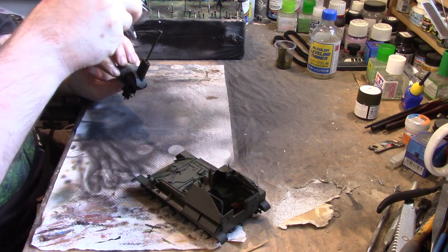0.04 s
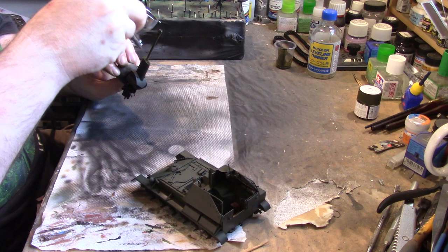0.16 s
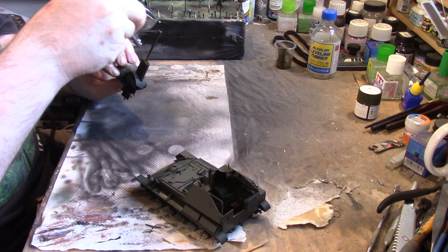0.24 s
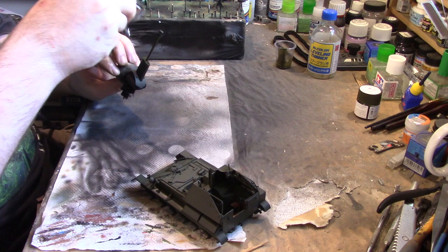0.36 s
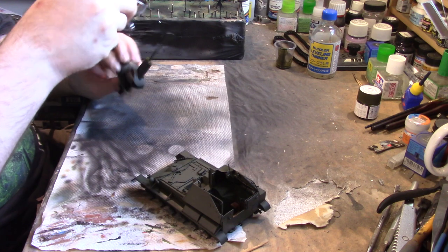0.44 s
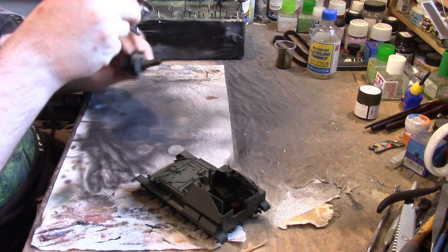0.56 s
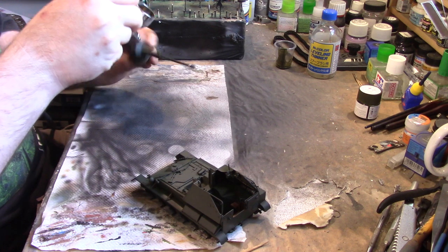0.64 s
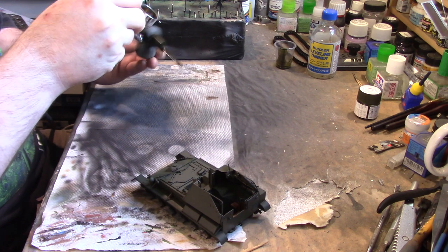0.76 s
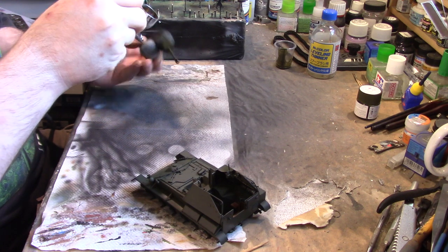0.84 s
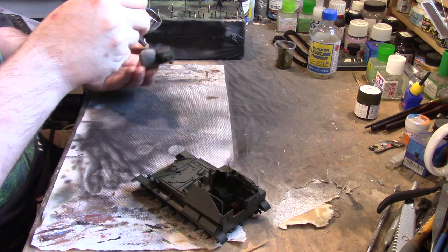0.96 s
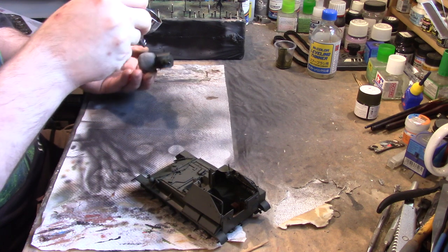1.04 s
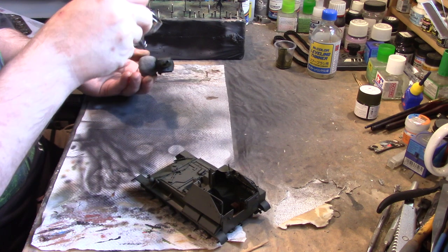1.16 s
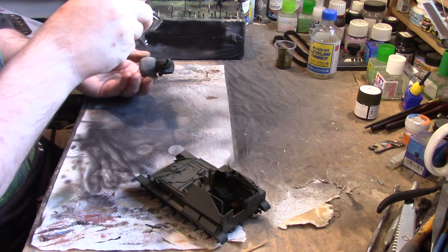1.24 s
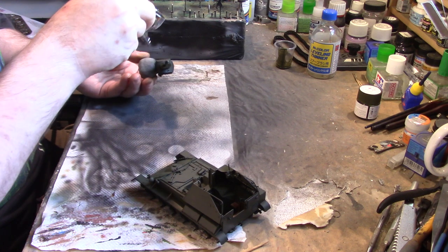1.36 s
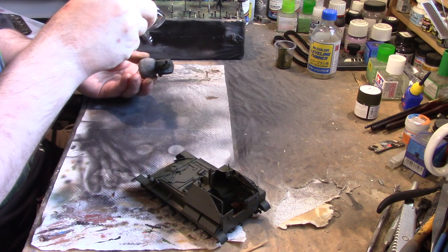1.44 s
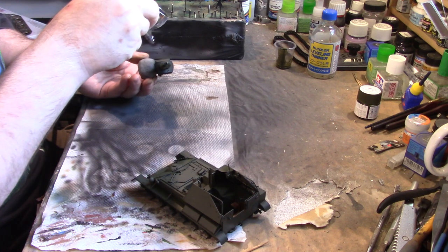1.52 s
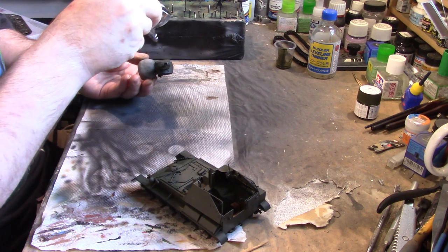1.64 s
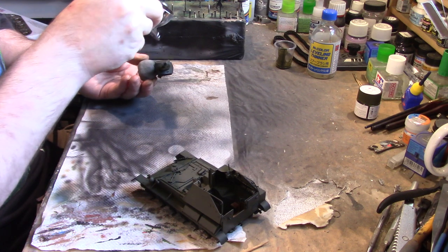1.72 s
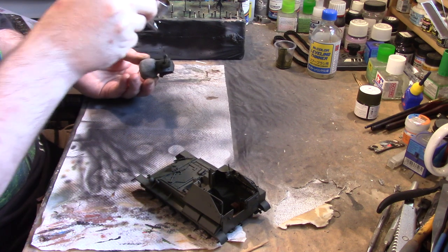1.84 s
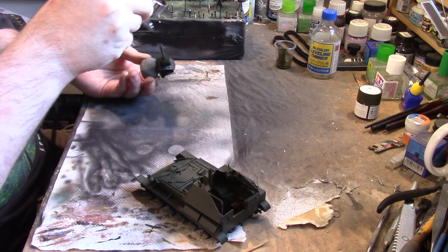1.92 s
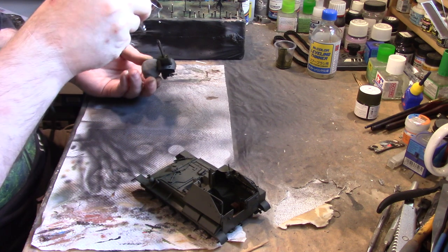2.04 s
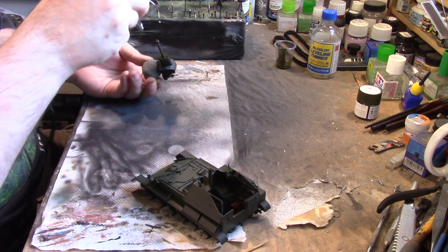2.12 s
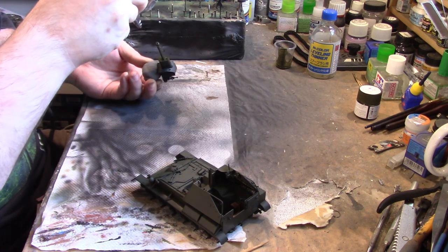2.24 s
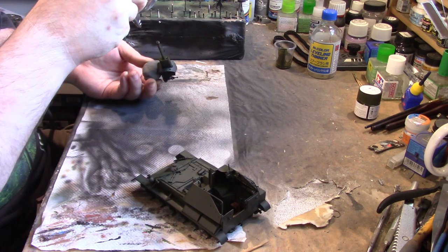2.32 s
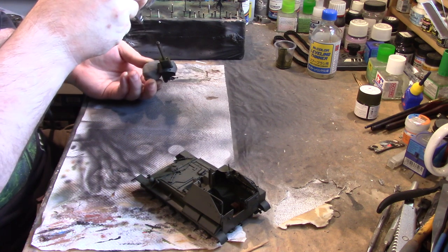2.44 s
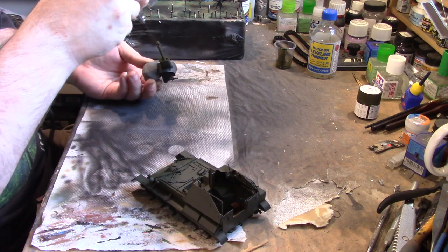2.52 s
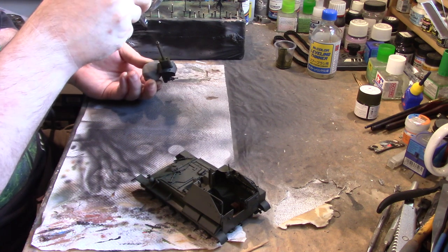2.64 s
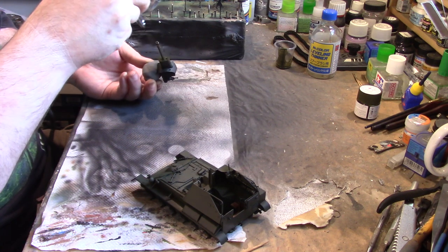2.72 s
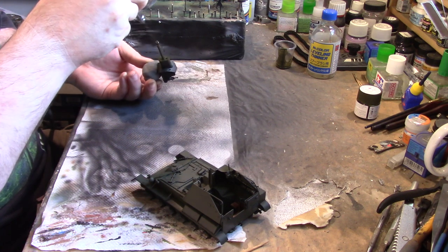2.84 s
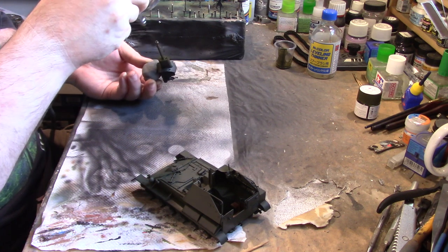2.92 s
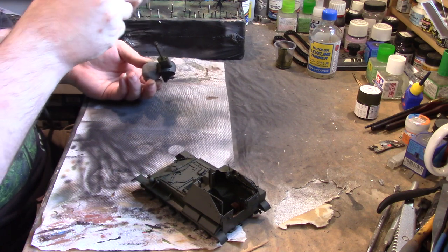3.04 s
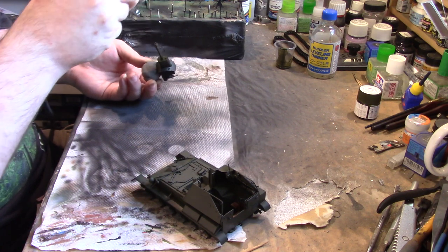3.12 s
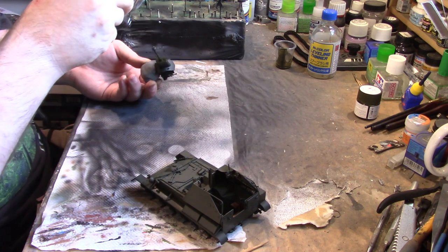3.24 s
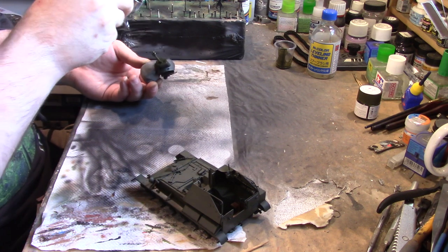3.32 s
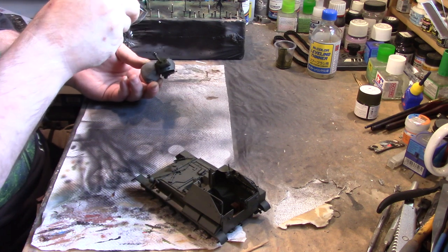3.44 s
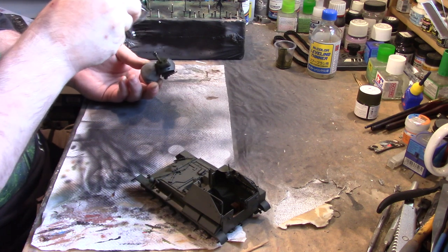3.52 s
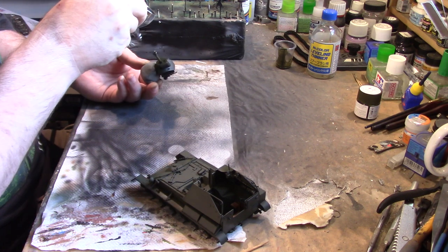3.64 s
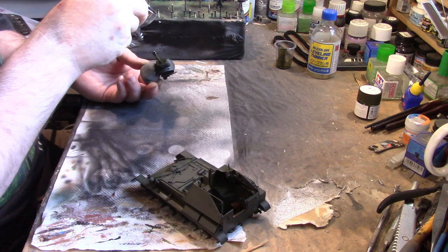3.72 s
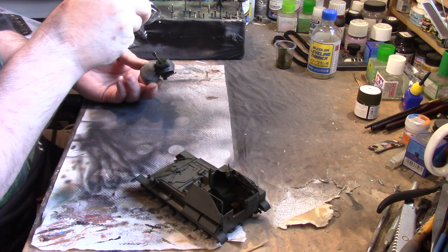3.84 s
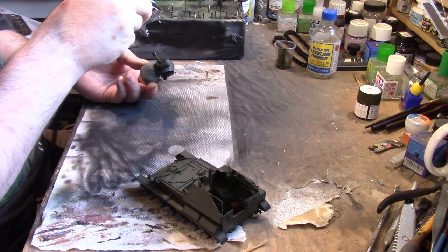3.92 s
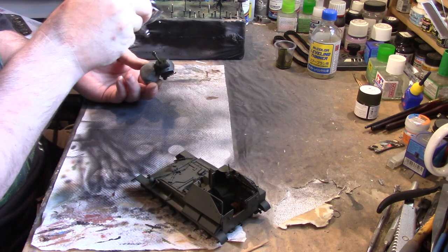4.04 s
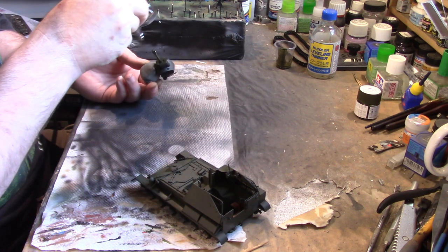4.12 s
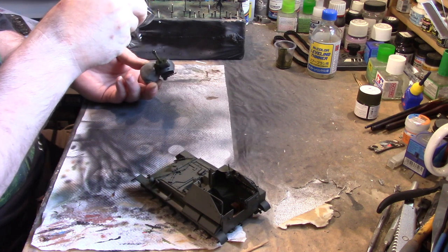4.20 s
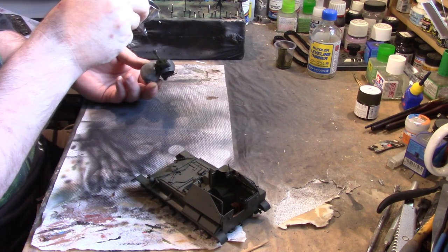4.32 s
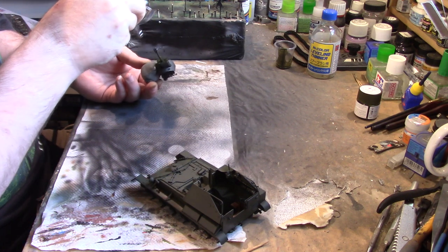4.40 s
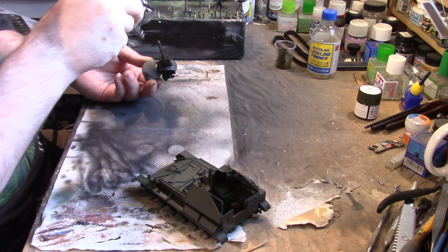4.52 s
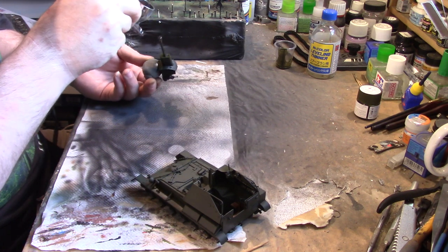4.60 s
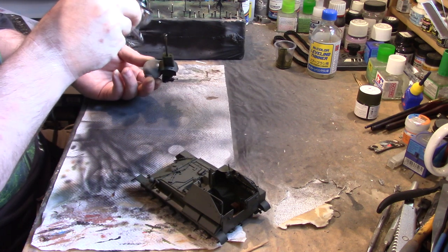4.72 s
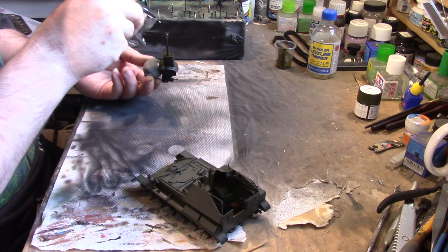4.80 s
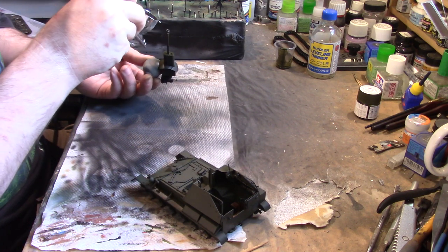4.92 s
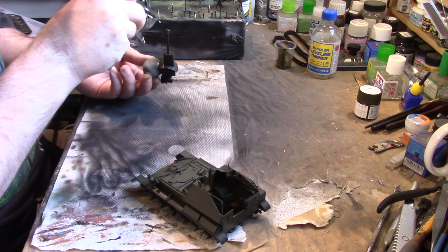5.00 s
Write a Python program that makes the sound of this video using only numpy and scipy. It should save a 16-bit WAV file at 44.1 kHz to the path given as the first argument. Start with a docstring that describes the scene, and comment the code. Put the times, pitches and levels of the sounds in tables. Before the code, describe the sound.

Close to a workbench in a small room, a fan hums softly while an airbrush is already hissing. It stops, a small plastic part clicks, and a very faint thin whine comes and goes. Four more bursts of spray follow, each swelling and then cutting off, with light ticks in the gaps. The air whistles slightly and roars hollowly against the part and the cupped hand, most strongly in the second-to-last burst.

```python
"""A workbench in a small room, where an airbrush sprays a hand-held model part in five bursts.
Turbulence at the nozzle hisses, with breathy edge tones; the jet rushes louder where it strikes the
part and roars in its hollows and in the cupped hand. Each new grip colours the sound anew.
Between bursts the part clicks as it is turned. A fan hums throughout; a thin whine comes and goes."""
import sys
import numpy as np
from scipy import signal
from scipy.fft import rfft, irfft
from scipy.io import wavfile
from scipy.ndimage import uniform_filter1d, map_coordinates

SR = 44100
rng = np.random.default_rng(int(sys.argv[2]) if len(sys.argv) > 2 else 0)


def unload_audio(sound):
    """Save the sound as a 16-bit wav file, at the path given as the first command line argument."""
    columns = np.transpose(np.atleast_2d(sound))
    # keep every value between -1 and 1, then stretch to whole-number steps
    steps = np.round(np.clip(columns, -1, 1) * 32767)
    wavfile.write(sys.argv[1], SR, steps.astype(np.int16))


N = 223229
TIME = np.arange(N) / SR
FREQ = np.arange(N // 2 + 1) * SR / N


def undb(db):
    """Amplitude ratio of a level in decibels."""
    return 10 ** (np.asarray(db) / 20)


def unit(x):
    """Normalisation to rms 1."""
    return x / np.sqrt(np.mean(x ** 2))


def slope(points):
    """Spectral envelope in dB, interpolated on a log-frequency axis."""
    hz, db = np.transpose(points)
    return np.interp(np.log(FREQ + 1), np.log(hz), db)


def bell(centre, width, axis=FREQ):
    """Gaussian of height 1 and the given full width at half height."""
    return .5 ** ((2 * (axis - centre) / width) ** 2)


def bumps(rows):
    """Superposition of spectral peaks and dips, in dB."""
    return sum(db * bell(hz, width) for hz, width, db in rows)


def ramp(start, length_s):
    """Linear rise from 0 to 1."""
    return np.clip((TIME - start) / length_s, 0, 1)


def walk(rate_hz):
    """Smooth random modulation of rms 1."""
    hold = max(int(SR / rate_hz), 1)
    steps = np.repeat(rng.standard_normal(N // hold + 1), hold)[:N]
    return unit(uniform_filter1d(steps, hold))


def noise(gain):
    """Spectrally shaped Gaussian noise of rms 1."""
    return unit(irfft(rfft(rng.standard_normal(N)) * gain, N))


def stereo_noise(db, side_level):
    """Partial coherence: the weaker the side signal, the more alike the noise in both ears."""
    mid, side = rfft(rng.standard_normal((2, N))) * undb(db)
    side = side * undb(slope(side_level))
    return unit(irfft(np.array([mid + side, mid - side]), N))


# Fan spectrum: (frequency [Hz], relative density [dB])
FAN_SPECTRUM = [(20, -39), (42, -22), (68, -5), (100, -6), (140, 4.5), (220, -3), (330, 0), (600, -3),
                (1000, -4), (1700, -9.5), (3000, -13.5), (5500, -16), (10000, -23.5), (15500, -35)]
# Humming bands: (frequency [Hz], width [Hz], gain [dB])
FAN_PEAKS = [(72, 9.2, 4.5), (152.3, 6, 7.5), (226, 10.5, 12), (257, 23, 6), (1340, 26, 1), (2900, 140, 3),
             (11080, 200, 8)]
# Stereo width of the fan: (frequency [Hz], side minus mid [dB])
FAN_WIDTH = [(30, -7), (80, -6), (170, -9), (350, -2.5), (1000, -10.5), (4000, -29.5), (12000, -6)]

def fan(level_db):
    """Broadband flow noise, with narrow bands that are heard as a hum."""
    rush = stereo_noise(slope(FAN_SPECTRUM) + bumps(FAN_PEAKS), FAN_WIDTH)
    return rush * undb(level_db + 1.3 * walk(7.17))


# Spells of the whine: (start [s], duration [s], relative level [dB])
WHINE_SPELLS = [(.39, .04, -76), (.52, 0.05, -72), (.678, .2, -73), (.92, .08, -78)]

def whine(gain_db, hz=5561, edge_s=.012, fade_db_per_s=44):
    """Random frequency modulation makes a thin tone waver; each spell fades slowly, then stops."""
    tone = np.sqrt(2) * np.sin(2 * np.pi * np.cumsum(hz + 4 * walk(28)) / SR)
    envelope = 0
    for start, length_s, db in WHINE_SPELLS:
        gate = ramp(start - edge_s, edge_s) - ramp(start + length_s, edge_s)
        envelope += gate * undb(db - fade_db_per_s * np.maximum(TIME - start, 0))
    return tone * envelope * undb(gain_db)


def room(x, wet_db, t60_s, treble_db):
    """Reverberation: diffuse reflections decay exponentially, duller than the direct sound."""
    age = TIME[:SR // 2]
    tail = rng.standard_normal(len(age)) * np.exp(-np.log(1000) * age / t60_s) * (age > .004)
    tail = tail / np.sqrt(np.sum(tail ** 2))
    dull = irfft(rfft(x) * undb(slope([(700, 0.5), (4000, -3.5), (14000, treble_db)])), N)
    return x + undb(wet_db) * signal.fftconvolve(dull, tail[None], axes=1)[:, :N]


# Ringing bands of part and fingers: (frequency [Hz], width [Hz], relative level [dB], T60 [s])
PART_RESONANCES = [(322, 400, 2, 0.089), (543, 150, -2.5, 0.06), (810, 190, -2, 0.13),
                   (1410, 820, -4, 0.07), (2360, 720, -2.5, 0.052), (4450, 4100, -5.5, 0.11),
                   (7200, 7900, -9.5, 0.12)]
# Spectrum of the contact snap: (frequency [Hz], gain [dB])
SNAP_SPECTRUM = [(200, -10), (1500, -4), (3000, -4), (4800, -3), (7200, 2), (9000, -10), (12000, -10),
                 (16000, -18)]
# Clicks of the turned part: (time [s], relative level [dB], extra gain of the snap [dB])
CLICKS = [(.5799, -42.5, 1.5), (.5962, -63, -6), (.635, -69, -14), (1.927, -55, -16), (3.105, -58, 4),
          (4.586, -53.5, -8)]

def handling_clicks(ring_db, snap_db):
    """Impact excitation: a sharp contact sets the plastic ringing, damped by the fingers."""
    bands = [(undb(db) * noise(bell(hz, width)), t60) for hz, width, db, t60 in PART_RESONANCES]
    body, contacts = np.zeros(N), np.zeros(N)
    for start, db, contact_db in CLICKS:
        age = np.maximum(TIME - start, 0)
        ring = sum(band * np.exp(-np.log(1000) * age / t60) for band, t60 in bands)
        body += undb(db + ring_db) * (TIME >= start) * ring
        contacts[int(start * SR)] += undb(db + contact_db + snap_db)
    # the contact pushes and lets go: a 90-degree phase shift gives one up-down swing
    return body + irfft(1j * rfft(contacts) * undb(slope(SNAP_SPECTRUM)), N)


def reflections(x, drift_s, share, longest_s, count):
    """Comb filtering: bench, arms and bottles return weak copies whose delays slide as hands move."""
    out = x.copy()
    for place, sway, sign in rng.uniform(-1, 1, (count, 3)):
        delay_s = longest_s * (2 + place * np.sqrt(2)) / (2 + np.sqrt(2)) + sway * drift_s
        positions = [np.arange(N) - delay_s * SR]
        echo = np.array([map_coordinates(ear, positions, order=3, mode="wrap") for ear in x])
        out += np.sign(sign) * share / np.sqrt(count) * echo
    return unit(out)


# Breathy whistles: (start [s], stop [s], first frequency [Hz], last frequency [Hz], width [Hz],
# level against the nozzle hiss [dB])
EDGE_TONES = [(-.005, 0.07, 6000, 6000, 100, -11), (2.065, 3.032, 8930, 8680, 330, -11.5),
              (2.291, 3.027, 4570, 4400, 220, -18), (3.485, 4.534, 10090, 10180, 300, -10.5),
              (3.474, 4.53, 12060, 12060, 240, -12), (4.774, 5.1, 6000, 6100, 120, -18)]

def edge_tones():
    """Edge tones: the grazing jet sheds narrow bands of noise that glide and waver as the part moves."""
    out = 0
    for start, stop, first_hz, last_hz, width, db in EDGE_TONES:
        hz = np.interp(TIME, [start, stop], [first_hz, last_hz]) * (1 + .003 * walk(9))
        phase = 2 * np.pi * np.cumsum(hz) / SR
        band = noise(bell(0, width)) * np.cos(phase) + noise(bell(0, width)) * np.sin(phase)
        gate = np.clip(np.minimum(TIME - start, stop - TIME) / 0.028, 0, 1)
        out += undb(db) * band * gate
    return out


# Passes of the jet over the part: (centre [s], duration [s], strike gain [dB], roar gain [dB])
SWEEPS = [(0.057, .11, 18, 9.5), (0.312, 0.096, 16.5, 13), (1.48, 0.31, 10.5, 13.5), (2.545, 0.1, 5, 0.5),
          (2.85, 0.052, 5, -4.5), (2.996, 0.05, 3, 4.5), (3.408, 0.23, -2, 5), (5.02, 0.12, 5, 3)]

def aim(roar_lag_s=0.023):
    """Jet impingement: gains in dB as the jet sweeps the face of the part first, then its hollows."""
    strike_db = sum(db * bell(s, length_s, TIME) for s, length_s, db, _ in SWEEPS)
    roar_db = sum(db * bell(s + roar_lag_s, length_s, TIME) for s, length_s, _, db in SWEEPS)
    return strike_db, roar_db


# Spectra of nozzle, struck part and hollows: (frequency [Hz], relative density [dB])
HISS_SPECTRUM = [(300, -40), (2500, -15.5), (4300, -5), (6000, -3.5), (8000, -1), (10000, 0), (12500, 0.5),
                 (14500, -1), (16000, -7)]
STRIKE_SPECTRUM = [(200, -44), (650, -5), (1050, 1.5), (2000, 1.5), (3400, 1.5), (4600, -2.5), (7000, -4),
                   (15000, -15)]
ROAR_SPECTRUM = [(100, -35), (190, -14.5), (245, -3.5), (380, -2.5), (560, 0.5), (820, -3.5), (1100, -12),
                 (2500, -36), (8000, -52)]
# Resonances between hands and bench: (frequency [Hz], width [Hz], gain [dB])
CAVITY_PEAKS = [(255.5, 6, 7), (383, 30.6, 7), (561, 25, 3.5), (754, 26, 2.5)]
# Faint left-right difference in the treble of a nearly mono sound: (frequency [Hz], side minus mid [dB])
SIDE_LEVEL = [(200, -29), (1000, -71), (2500, -84), (5000, -49), (7500, -27.5), (12000, -19.5)]

def jet_noise():
    """Turbulence radiates a hiss at the nozzle, a rush where it strikes and a roar in resonant hollows."""
    drift_s = 2.5e-5 * walk(3.0)
    hiss = stereo_noise(slope(HISS_SPECTRUM), SIDE_LEVEL)
    hiss = reflections(hiss, drift_s, share=0.38, longest_s=.006, count=6)
    strike = stereo_noise(slope(STRIKE_SPECTRUM), SIDE_LEVEL)
    strike = reflections(strike, drift_s, share=0.2, longest_s=.012, count=4)
    roar = stereo_noise(slope(ROAR_SPECTRUM) + bumps(CAVITY_PEAKS), SIDE_LEVEL)
    hiss += edge_tones()
    aim_strike_db, aim_roar_db = aim()
    # paint leaves the needle unevenly, and the jet buffets the edges of the part
    hiss *= undb(0.9 + 0.36 * walk(70))
    strike *= undb(aim_strike_db + 0.56 + .5 * walk(45))
    roar *= undb(aim_roar_db - 0.5 + .5 * walk(50))
    return hiss, strike, roar


def valve(start, stop, opening_s, decay_s):
    """Flow transients: air builds smoothly until the start and decays exponentially after the stop."""
    press = np.sin(np.pi / 2 * ramp(start - opening_s, opening_s)) ** 2
    release = np.exp(-np.maximum(TIME - stop, 0) / decay_s)
    return press, release


def trigger(start, stop, pull_s, rest_s=0.064, ease_s=0.059):
    """Throttling: gains in dB rise as the trigger is pulled back; the hiss sinks as it eases forward."""
    idle = 1 - ramp(start + rest_s, pull_s - rest_s)
    eased = ramp(stop - ease_s, ease_s)
    hiss_db = -7 * idle - 4.5 * eased
    part_db = -5.5 * idle
    return hiss_db, part_db


# Bands that part and fingers reinforce or cancel in each grip: (frequency [Hz], width [Hz], gain [dB])
GRIP_1 = [(232, 160, -4.5), (585, 76, 3.5), (870, 92, -1.5), (1145, 140, 5), (1620, 150, -4.5),
          (2660, 140, 5.5), (3006, 81, 7), (3240, 160, -2.5), (3600, 240, 3.5), (4080, 270, -1),
          (4680, 500, 4), (5050, 990, -4.0), (6560, 490, -4), (8040, 270, -1.5), (10150, 540, 2.5)]
GRIP_2 = [(230, 200, -4), (580, 140, 2), (1450, 100, 1.5), (2650, 1000, -4), (2750, 690, 6), (3610, 190, 4),
          (4500, 180, -3), (4920, 230, 3.0), (5350, 1040, -4.0), (6000, 200, 5), (6830, 220, 2),
          (7650, 160, -2.5), (8140, 350, 4), (10200, 340, 5), (11300, 230, 4.5), (14020, 230, 5.0),
          (14100, 260, -6.5), (14900, 300, 2)]
GRIP_3 = [(1080, 81, 4.5), (2710, 220, 2), (3320, 270, -4.5), (3480, 2200, 3.5), (3980, 310, -5.5),
          (4840, 580, -4), (6480, 200, -1.5), (6700, 180, -5), (7800, 330, -2), (9380, 240, -1),
          (10830, 560, 4), (11600, 240, 4.5), (12900, 160, -3.0), (13500, 280, 5.5), (14620, 530, -4.0)]
GRIP_4 = [(130, 69, 8.5), (566, 55, 1.5), (785, 89, 4), (1010, 800, -1), (1434, 200, 6.0),
          (1920, 270, -4.5), (3330, 124, -13), (3600, 510, 3), (4760, 170, -3), (6130, 1300, -2.5),
          (6370, 670, 4), (8000, 260, 1), (9260, 320, -3), (10900, 220, 1.5), (11080, 160, 0),
          (13100, 160, -6), (13770, 160, -5), (14120, 190, -3)]
GRIP_5 = [(670, 250, 6), (940, 130, -1.5), (1370, 220, 4.5), (3330, 170, -1), (5400, 490, -2.5),
          (7660, 180, -6), (8760, 1100, 4.5), (10520, 630, 3.5), (12000, 1300, 3.5), (13240, 330, -6)]
# Bursts, with relative levels at full trigger: (air on [s], air off [s], valve opening [s],
# trigger pull [s], decay constant [s], hiss [dB], strike [dB], roar [dB], grip)
BURSTS = [(-.4, 0.337, .03, .3, 0.013, -28.5, -48.5, -52.5, GRIP_1),
          (1.156, 1.749, 0.06, 0.35, 0.015, -30, -45.5, -56, GRIP_2),
          (2.102, 3.009, 0.046, 0.31, 0.014, -30, -44, -49, GRIP_3),
          (3.422, 4.513, 0.04, 0.24, 0.014, -29, -37.5, -40, GRIP_4),
          (4.781, 5.11, 0.037, 0.22, .017, -30, -41.5, -47.5, GRIP_5)]

def airbrush():
    """Source and filter: one valve gates the jet noise, and interference at each grip colours it."""
    hiss, strike, roar = jet_noise()
    out = 0
    for start, stop, opening_s, pull_s, decay_s, hiss_db, strike_db, roar_db, grip in BURSTS:
        pull_hiss_db, pull_part_db = trigger(start, stop, pull_s)
        press, release = valve(start, stop, opening_s, decay_s)
        at_nozzle = hiss * undb(hiss_db + pull_hiss_db)
        at_part = (strike * undb(strike_db) + roar * undb(roar_db)) * undb(pull_part_db)
        # the nozzle hisses first; only a fully grown jet reaches the part
        air = press * release * (at_nozzle + press ** 2 * at_part)
        out += irfft(rfft(air) * undb(bumps(grip) - 0.79), N)
    return out


def scene():
    """Superposition: spray and clicks reverberate in the room, over the fan and the whine."""
    near = airbrush() + handling_clicks(ring_db=-2, snap_db=27.5)
    in_room = room(near, wet_db=-7.5, t60_s=0.24, treble_db=-12)
    return in_room + fan(level_db=-54.5) + whine(gain_db=2.0)


def record(dry):
    """Band limiting: a steep elliptic low-pass removes the highest treble."""
    cutoff_hz = 15900
    return signal.sosfilt(signal.ellip(12, .1, 80, cutoff_hz, fs=SR, output="sos"), dry)


dry = scene()
out = record(dry)
unload_audio(out)
```